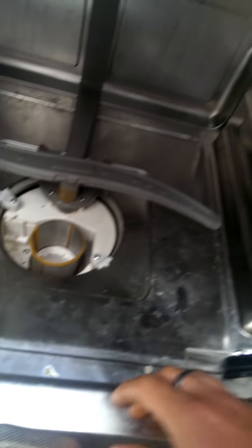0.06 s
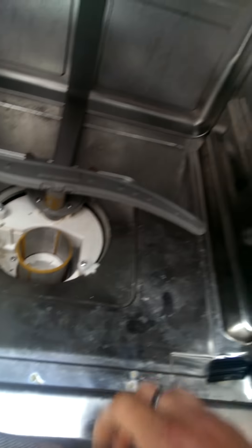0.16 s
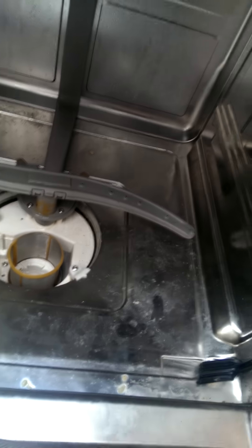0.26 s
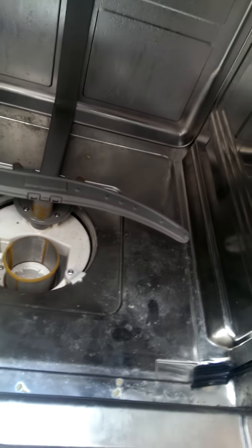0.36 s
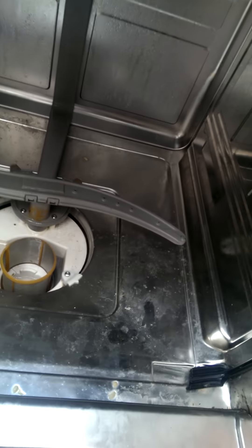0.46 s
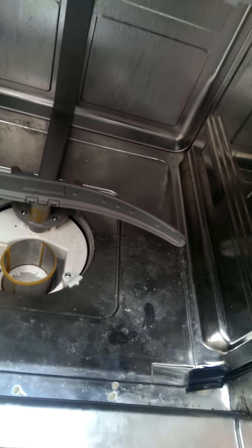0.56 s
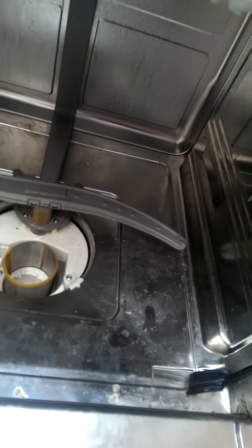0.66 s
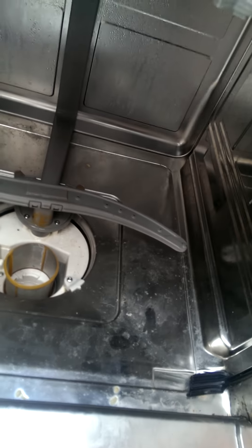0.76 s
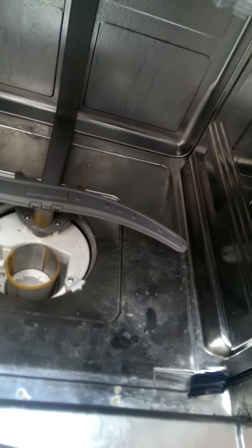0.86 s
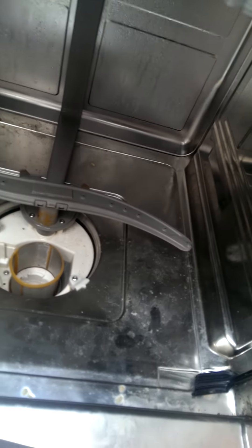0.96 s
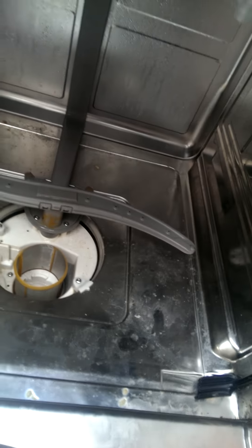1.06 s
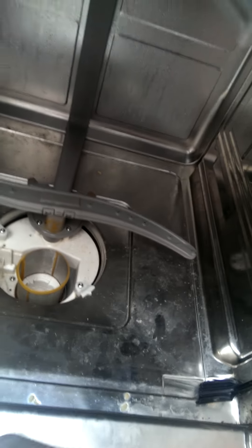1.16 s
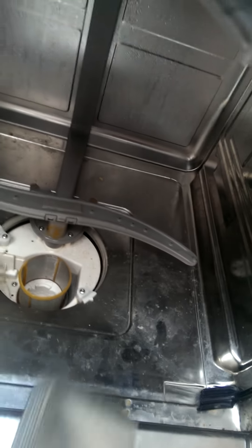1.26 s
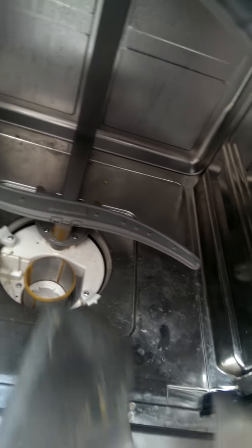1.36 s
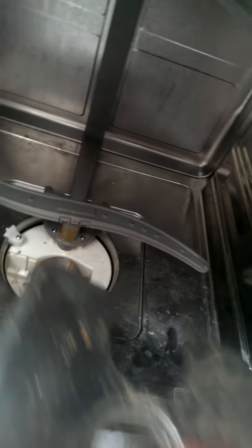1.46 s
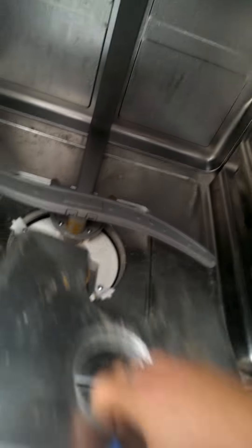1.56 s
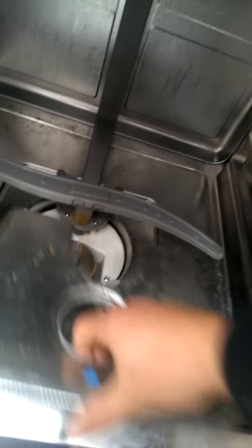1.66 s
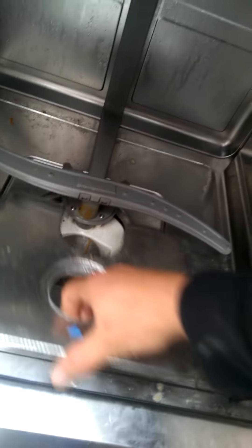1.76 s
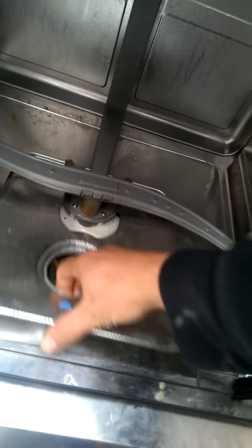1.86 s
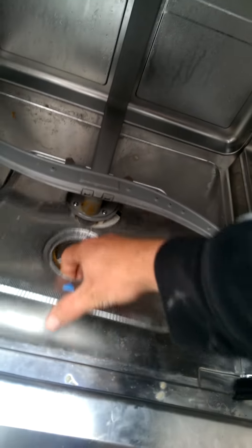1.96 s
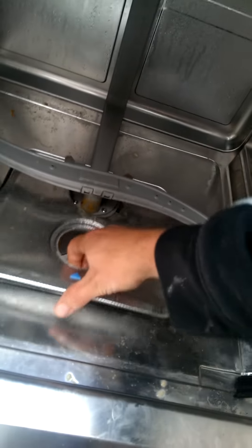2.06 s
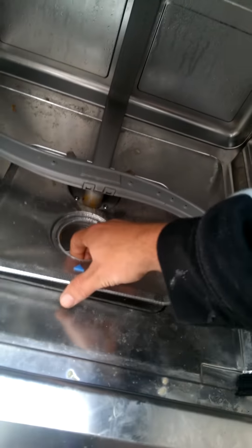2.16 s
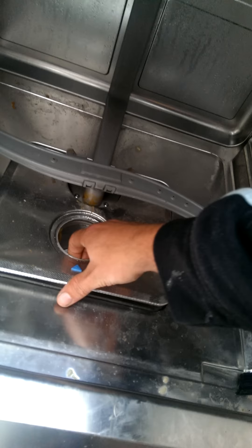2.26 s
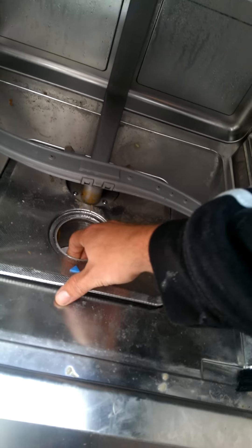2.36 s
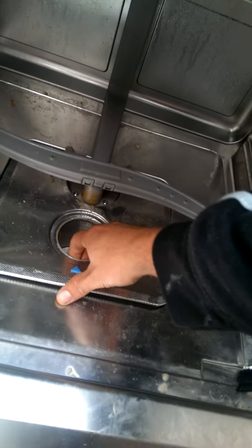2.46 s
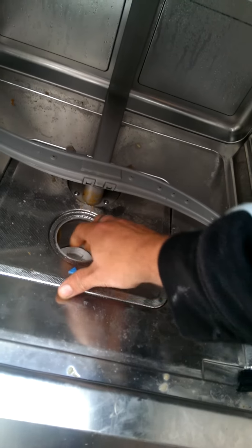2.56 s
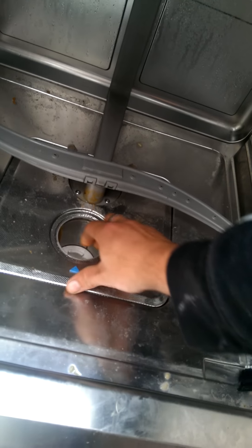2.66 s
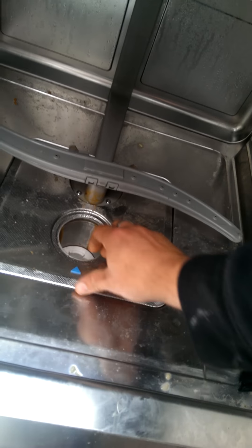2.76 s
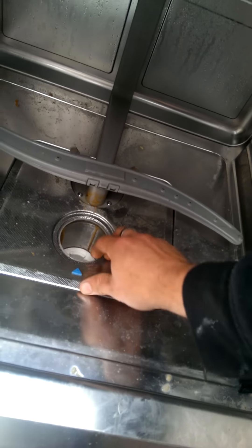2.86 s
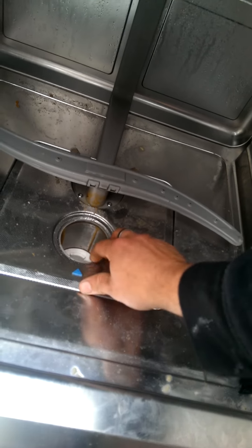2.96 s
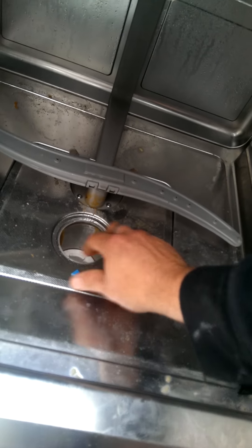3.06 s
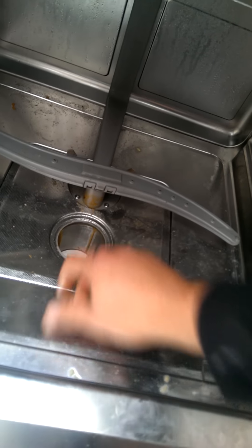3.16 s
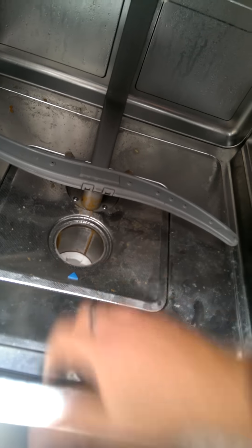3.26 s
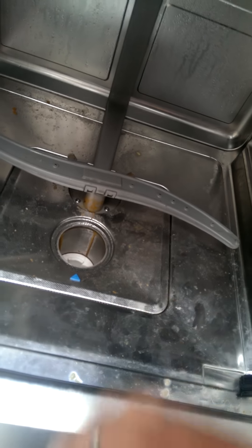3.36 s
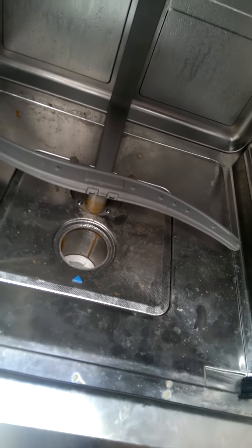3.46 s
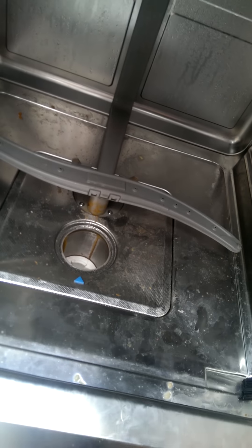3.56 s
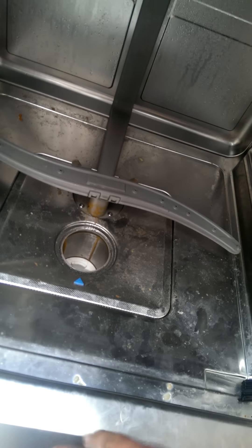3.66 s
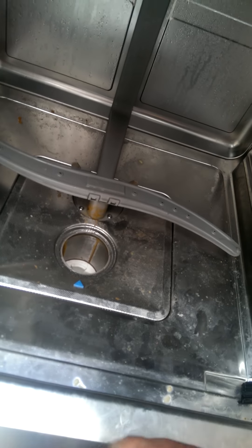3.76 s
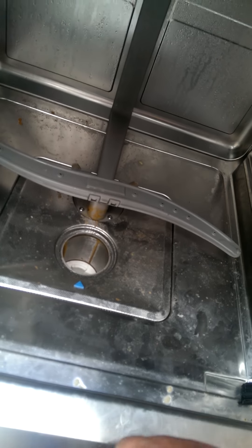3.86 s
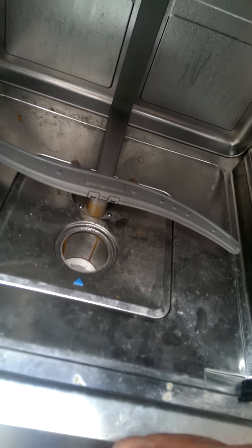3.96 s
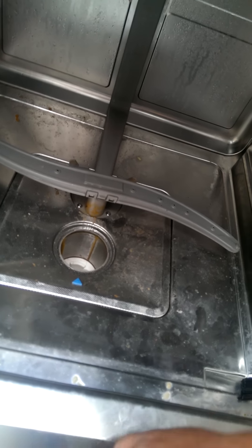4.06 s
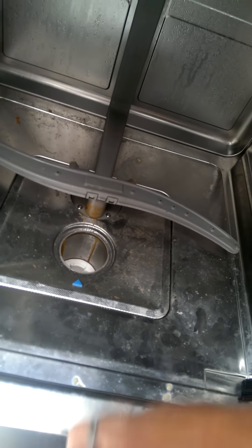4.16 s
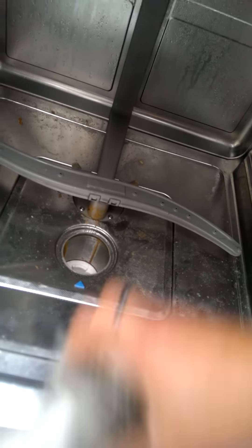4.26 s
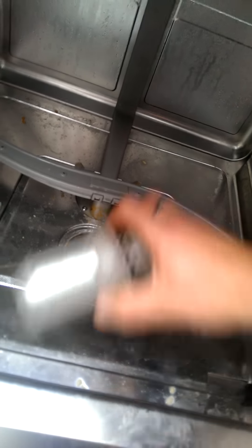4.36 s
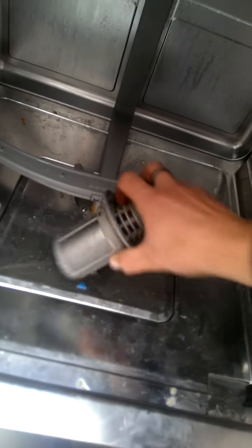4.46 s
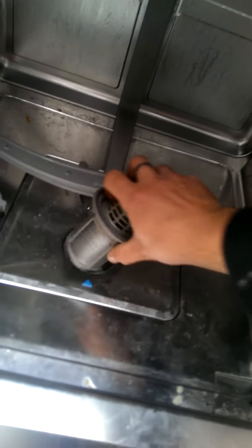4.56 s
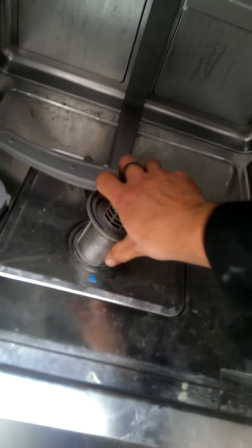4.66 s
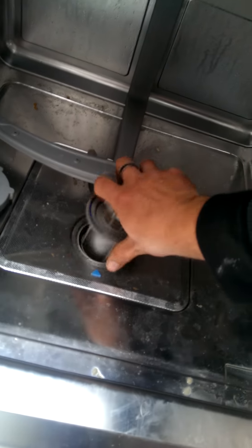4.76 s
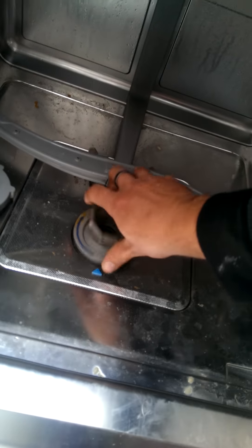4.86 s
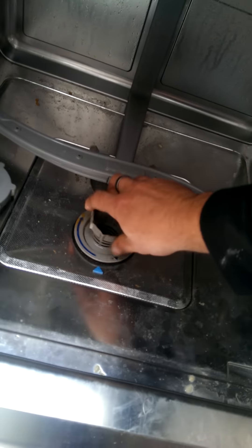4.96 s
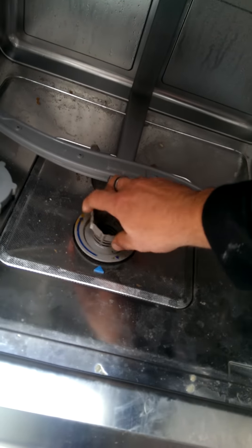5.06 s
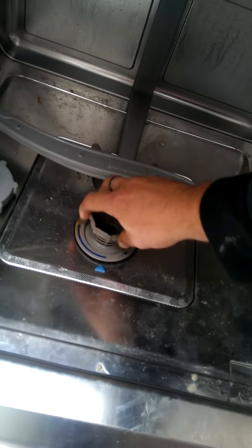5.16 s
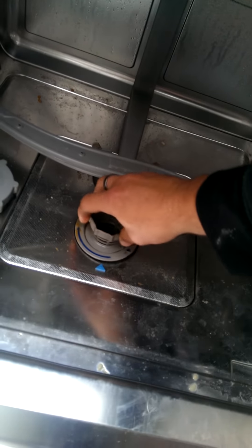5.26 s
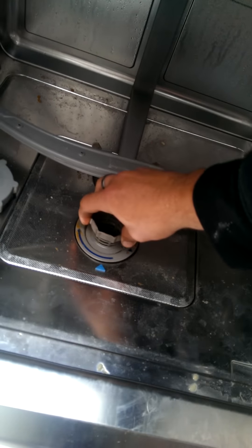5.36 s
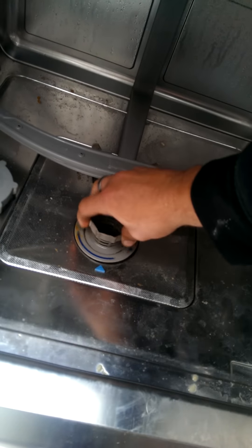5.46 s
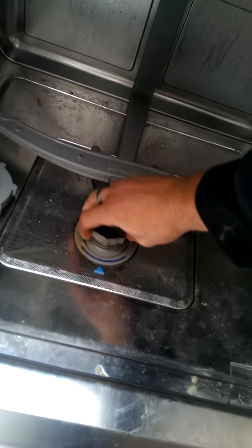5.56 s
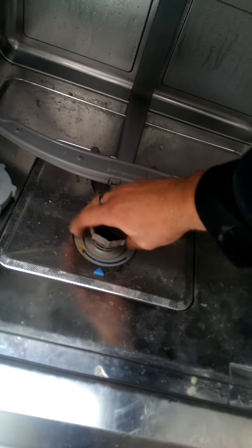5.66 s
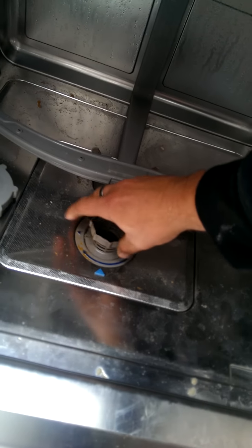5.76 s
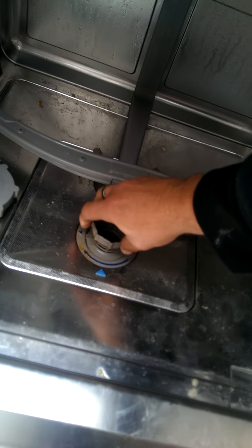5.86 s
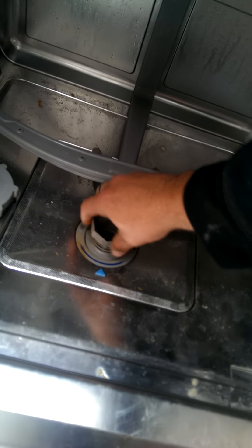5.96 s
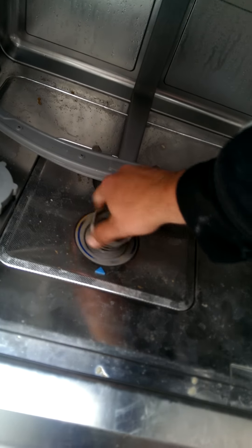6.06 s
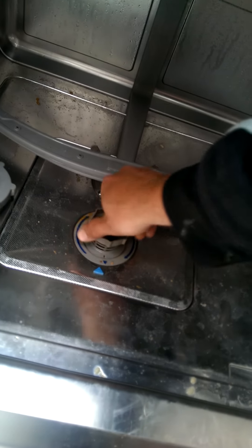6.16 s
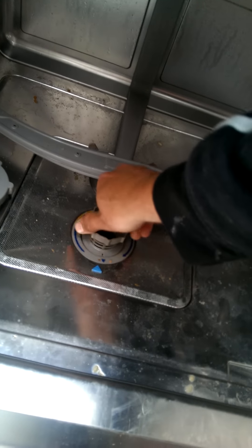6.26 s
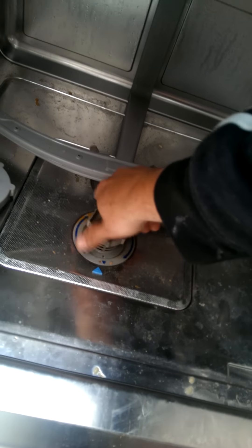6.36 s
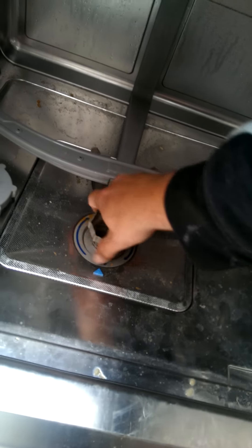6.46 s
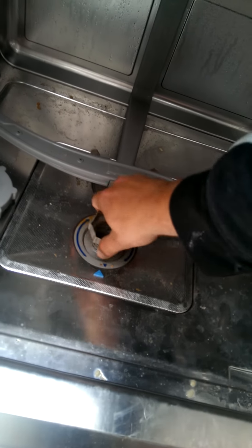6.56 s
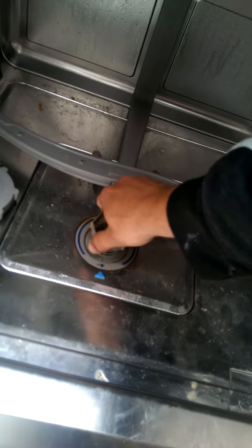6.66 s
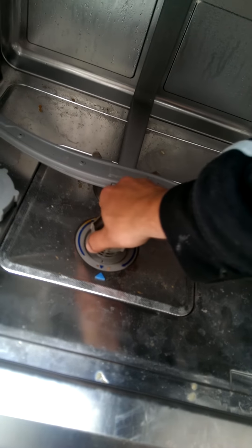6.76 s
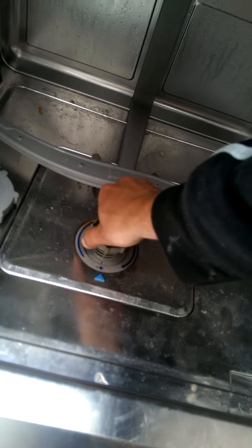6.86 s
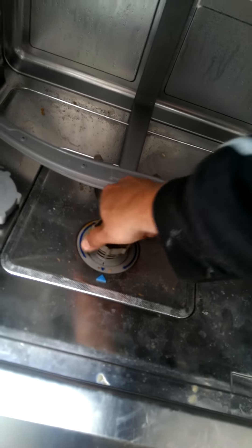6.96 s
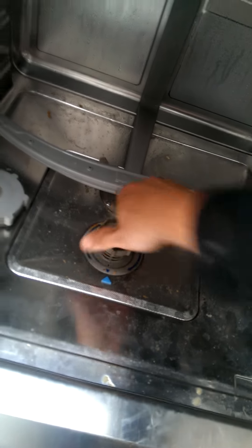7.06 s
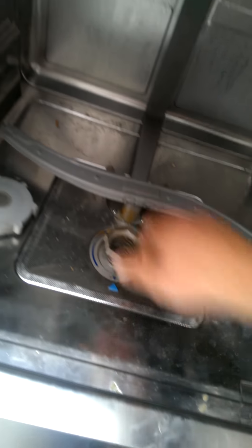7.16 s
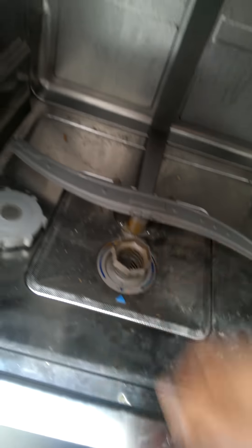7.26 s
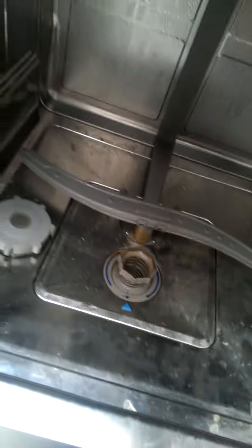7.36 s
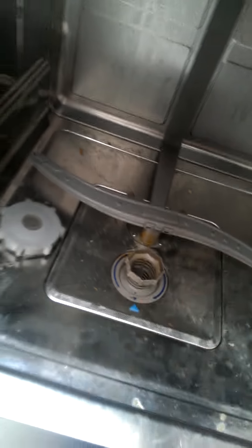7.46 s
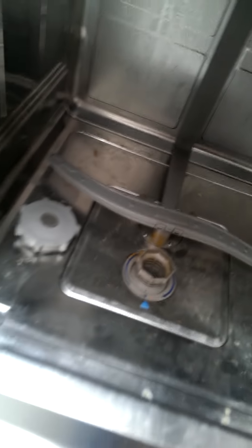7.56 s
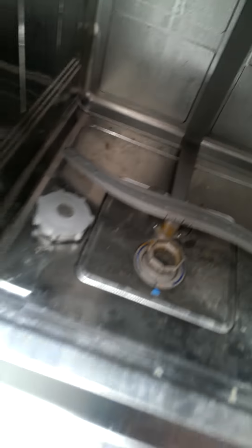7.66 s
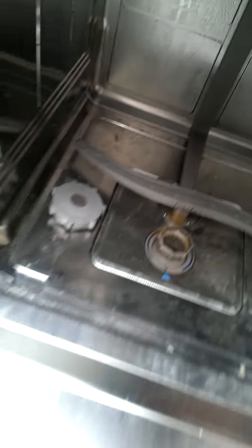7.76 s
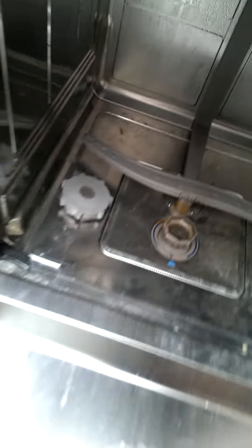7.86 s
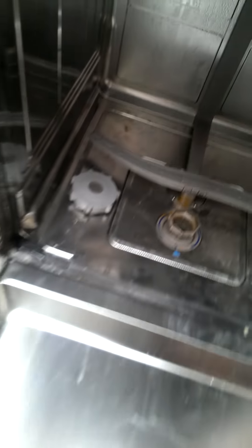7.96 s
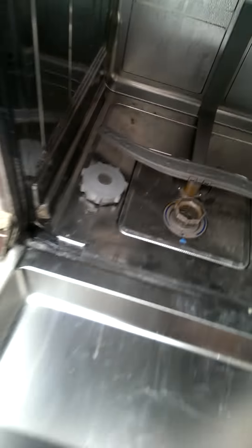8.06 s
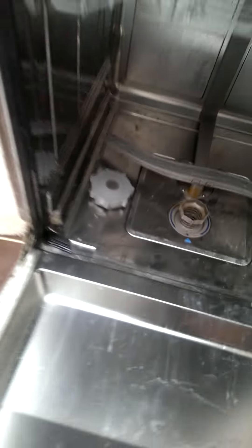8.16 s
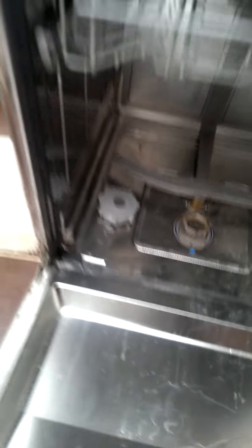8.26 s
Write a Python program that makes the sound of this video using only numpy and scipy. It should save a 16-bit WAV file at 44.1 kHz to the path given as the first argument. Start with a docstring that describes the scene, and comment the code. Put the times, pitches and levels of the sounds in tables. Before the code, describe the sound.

A quiet kitchen hiss and a low motor drone run throughout, with faint rumble from the hand holding the microphone. Around 1 second come a few light taps and scrapes inside a steel dishwasher tub. From 2.1 to 2.5 seconds a steel strainer plate is laid down with a quick, loud cluster of knocks and a scrape, then clatters into its seat at 2.6. Lighter taps and scrapes follow near 3.8. A plastic filter cup clatters in at 4.8 and, louder, at 5 seconds. It is twisted home with small scrapes and pushes, snapping sharply at 5.7 and 6.2. Faint clicks continue to about 7.1, with one soft knock at 7.6. The contacts are close, slightly to the right, and ring briefly in the steel walls. A sleeve rustles faintly at times, and rustle and hiss rise a little near the end, around 8 seconds.

```python
"""A steel strainer plate is laid into the floor of an open dishwasher; a plastic filter cup is then dropped
in and twisted home. Taps, finger pushes, clatters, snaps and scrapes drive the modes of plate or cup and of
the steel tub, whose walls ring on. Noise swells give a sleeve's rustle and one faint, hissy after-ring of
the plate. Behind them: kitchen hiss, a motor drone, the rumble of the hand holding the microphone and a low
rumble that swells around the knocks. Two close ports, the right one louder and brighter."""
import sys
import numpy as np
from scipy import signal
from scipy.fft import rfft, irfft, next_fast_len
from scipy.io import wavfile
from scipy.ndimage import uniform_filter1d

SR = 44100
rng = np.random.default_rng(int(sys.argv[2]) if len(sys.argv) > 2 else 0)


def wrap_up_sound(samples):
    """Save the sound to the file named by the first command line argument, as 16-bit audio."""
    columns = np.atleast_2d(samples).T
    # keep every value between -1 and 1, then stretch to whole-number steps
    tamed = np.clip(columns, -1, 1)
    steps = np.round(tamed * 32767).astype(np.int16)
    wavfile.write(sys.argv[1], SR, steps)


N = 366471

# Soft finger pushes. Each row: start in seconds, ring band level in dB, boom, body and treble in dB
# against the ring band, favoured boom and ring frequencies in Hz.
PUSHES = [(2.3137, -28, -14, -6.5, -8, 248, 2660), (2.3647, -51, 1.5, -.5, -1, 132, 1790),
          (3.0243, -65.5, -1.5, 6, -16, 92.8, 1290), (3.9685, -73, 6, 20, -7.5, 253, 1500),
          (4.4298, -76, -14, -7.5, 7, 62.3, 1420), (4.8346, -40, -3, -4.5, -15, 230, 2880),
          (4.8846, -40, -3, -5, -20, 140, 1240), (5.2022, -51, 17, 1, -15, 131, 1190),
          (5.3148, -40.5, -7.5, -9, -22.5, 133, 1570), (5.4035, -54.5, 18.5, 7, -17, 161, 1800),
          (5.467, -49, -0.5, 2.5, -22.5, 122, 1130), (5.88, -73, 22, 14.5, -14, 132, 1080),
          (6.094, -50.5, 9.5, 5, -4, 132, 1290), (6.159, -29, -15, -5.5, -11, 109, 2310),
          (6.3414, -67, -12, 17, -8, 299, 1180), (6.4282, -71.5, 19, 11, -5, 143.4, 1620),
          (6.572, -67, 17, 10, -9, 131.4, 1200), (6.7608, -59, 18.5, 8.5, -15.5, 135, 1130),
          (7.0693, -71, 23, -2, -8.5, 140, 1390)]
# Sharp contacts. Each row: as PUSHES, then fade in ms.
TAPS = [(0.763, -59, -2.5, -8, -1, 108, 2900, 190), (0.9152, -52.5, 3.5, -4, -13, 206, 1810, 82),
        (1.0004, -32.5, -16, -7.5, -10, 76, 3040, 193), (1.0598, -58, 12, 8.5, -15, 80.6, 1630, 63),
        (2.098, -25.5, -17, -10, -22, 223, 1700, 85), (2.161, -21.5, -23.5, -11, -22, 215, 1560, 128),
        (2.2122, -23.5, -1.5, -7, -26.5, 239, 1620, 86), (2.2393, -25, -1.5, -2, -5, 126.6, 1680, 180),
        (2.2671, -18.5, -10.5, -11, -51, 146.7, 1950, 79), (2.279, -23.5, -14, -7, -6, 169.4, 1964, 120),
        (2.4014, -37, -6, -6.5, -12, 250.4, 1810, 195), (2.4784, -40, -14, -8.5, -11, 246.6, 1940, 83),
        (3.7198, -57.5, 3, -6.5, -6, 81.9, 2230, 104), (3.7942, -33, 6, 5.5, -18.5, 100.7, 2030, 104),
        (4.0672, -57.5, 18.5, 5.5, -13, 104, 2140, 185), (4.2344, -61.5, 0, 5.5, 3, 233, 4200, 94),
        (5.5867, -32.5, -7.5, -4.5, -19.5, 111, 1230, 116), (5.9388, -40, -7.5, -5.5, -1.5, 260, 2570, 140),
        (6.8129, -55, 3, 12, -14.5, 483, 1223, 52), (6.9002, -59.5, -14, 0, -31.5, 61.5, 1200, 86),
        (7.0283, -53.5, 5.5, 9, -10, 470, 1480, 113), (7.1232, -53, 11.5, 12.5, -27.5, 470, 1470, 58),
        (7.608, -43, 3, 3, -25, 99.4, 2100, 520)]
# A part clatters or snaps into its seat; the last two are short cup snaps.
# Each row: as PUSHES, then hold in ms.
CLATTERS_AND_SNAPS = [(2.621, -18.5, -7, -5, -5, 111.6, 2600, 56),
                      (4.762, -29.5, -3.5, -5, -9, 102.5, 2326, 22),
                      (4.962, -17.5, -4, -2, -7.5, 471, 2760, 36),
                      (5.702, -23, -11.5, -5.5, -9.5, 235, 1500, 2.8),
                      (6.182, -24.5, -13.5, -5, -2.5, 122.4, 2180, 5.5)]
# A part slides. Each row: as PUSHES, then swell in ms, hold in ms.
SCRAPES = [(0.921, -46, 6, -1, -14, 217, 1460, 16.5, 57), (1.039, -47, -15, -7.5, -12.5, 76, 3200, 21, 63),
           (2.23, -23.5, -20.5, -12, -18, 142, 1970, 9.7, 71),
           (3.725, -52.5, 1, -7.5, -13, 100, 2100, 28, 97),
           (3.769, -38.5, -20, -24, -12, 99.3, 2130, 6.8, 25),
           (3.839, -52.5, -1.5, -15, -7, 99.8, 3700, 21.5, 64),
           (3.99, -64.5, -7.5, 0, -9, 100, 3290, 24, 36),
           (4.909, -42.5, 2.5, -1.5, -21.5, 101, 1140, 32, 5),
           (5.547, -50.5, 5, 0.5, -12, 130, 1950, 15, 41),
           (5.606, -51, 9.5, 5.5, -4.5, 117.5, 5000, 12.5, 57),
           (5.672, -36.5, 1.5, -19, -27.5, 135, 1420, 18.5, 10),
           (6.011, -54, 2, 3.5, -9, 120, 1980, 22, 74), (6.099, -46, 8.5, 2, -1, 116.4, 2040, 39, 30),
           (6.673, -62, 5, 3, 1.5, 140, 3000, 17.5, 32), (6.727, -56, 14.5, 1.5, 2.5, 142, 3540, 11, 35.5)]
# Modes of plate, cup and tub. Each row: frequency in Hz, gain in dB, t60 in seconds before limiting.
PLATE_MODES = [(517, -0.5, .06), (631, 0, .08), (1310, -7, 0.12), (1584, 4, 0.016), (1907, 1, 0.038),
               (1970, -10.5, .08), (2562, -4, 0.092), (2840, -13.5, .05), (3400, -20, .07),
               (4120, -7, 0.047), (4600, -21.5, 0.15), (6000, -14, 0.043), (6500, -17, .05)]
CUP_MODES = [(594, -10, 0.074), (1149, 3, 0.088), (1502, 1.5, 0.012), (1805, 6.5, 0.09), (2076, -2, 0.013),
             (2490, 0.5, 0.069), (2864, -14, 0.09), (3140, -0.5, 0.048), (3830, -9.5, 0.048),
             (4010, -4, .03), (5000, -18.5, 0.09), (6100, -12, .03)]
TUB_MODES = [(82.1, 0.014, 0.59), (104.8, 0.0054, 0.087), (130.2, 0.0061, 0.05), (199.4, 0.0064, 0.032),
             (241.1, 0, 0.15), (322.5, 0.019, 0.078), (396, 0.0033, 0.08), (475, 0.043, 0.03)]
# Dense ring of the walls. Each row: frequency in Hz, t60 in seconds before limiting.
TUB_TAIL_T60 = [(60, 1.9), (160, 0.54), (420, 0.64), (1100, 0.44), (2910, 0.4), (7680, 0.24)]
# Position of the working hand. Each row: time in seconds, left minus right in dB.
HAND_PAN = [(0.8, -4), (2.0, -9), (3.0, -5.5), (3.7, -3.5), (4.0, -5), (4.7, -6.5), (5.7, -7), (6.1, -8),
            (7.6, -5.5)]
# Contact bands: boom, body, ring, edge, treble. Each row: low and high edge in Hz.
BANDS_HZ = [(65, 300), (300, 820), (1080, 2400), (2400, 5200), (5200, 18000)]
# One value per band: left minus right in dB.
BAND_PAN_DB = [1, 2.5, 1, 2.5, -4.5]
# One value per band: extra decay as a share of the contact's fade rate.
BAND_EXTRA_DECAY = [0.01, 0.05, .2, .45, .7]
# Sleeve rustles; the row at 2.92 s is the faint hissy after-ring of the plate's clatter.
# Each row: peak time in seconds, Gaussian sigma in seconds, broad noise in dB, crisp top in dB.
RUSTLE_SWELLS = [(.42, 0.23, -71, -72.5), (.95, .3, -73, -76), (1.995, 0.16, -73, -64.5),
                 (2.92, 0.078, -68, -86), (3.35, 0.26, -79, -77), (4.724, 0.22, -85, -73),
                 (7.097, 0.19, -90, -70.5), (7.656, 0.19, -63.5, -73.5), (8.28, 0.27, -59, -60)]
# Rustle and room noise spectra. Each row: frequency in Hz, relative density in dB.
RUSTLE_SPECTRUM = [(700, -39), (1300, -14.5), (2000, -6.5), (2900, -9), (3900, -3.5), (4600, -2.5),
                   (5300, -6.5), (5900, -11.5), (6450, -6), (7100, -13), (9500, -23), (10500, -19.5),
                   (13000, -38.5)]
HISS_SPECTRUM = [(15, -43), (25, -19), (120, -8), (149, -26), (249, -17.5), (317, -21.5), (344, -18.5),
                 (394, -28), (476, -20.5), (516, -25.5), (1400, -22.5), (3620, -31.5), (11600, -38.5),
                 (13200, -33), (16000, -44.5)]
# Motor drone. Each row: centre in Hz, width in Hz, relative level in dB.
DRONE_BANDS = [(107.3, 5, 0), (221.4, 6.5, -12), (352, 5, -14), (270, 13, -7.5), (75.5, 11, -2.5)]
# The microphone backs out of the tub: hiss grows, drone sinks. Each row: time in seconds, hiss lift in dB.
HISS_LIFT = [(0, 1.6), (7.6, 2), (8.0, 5.5), (8.31, 7)]
# Rumble of the holding hand. Each row: time in seconds, level in dB.
GRIP_LEVELS = [(0.0, -69), (0.5, -59), (0.75, -83), (1.3, -78), (1.6, -66.5), (1.96, -78.5), (2.55, -69.5),
               (3.0, -60.5), (4.55, -79), (5.4, -76.5), (6.06, -75), (6.25, -61), (7.5, -58.5), (8.31, -68)]
# Low rumble that swells around the knocks. Each row: peak time in seconds, level in dB.
RUMBLE_SWELLS = [(.97, -54), (2.25, -64), (2.7, -56.5), (4.8, -65.5), (4.98, -51), (5.741, -54)]
# Likeness of the two ports. Each row: frequency in Hz, coherence from 0 to 1.
COHERENCE = [(60, .95), (130, 0.87), (290, 0.9), (640, 0.6), (1400, 0.02), (16000, 0.03)]
# Balance of background and rustle. Each row: frequency in Hz, left minus right in dB.
BACKGROUND_PAN = [(60, -3), (110, -7.5), (200, 0), (380, -8), (700, -2), (1290, -6), (2380, -3.5),
                  (4400, -2), (8120, 2), (15000, -2.5)]
RUSTLE_PAN = [(60, -1), (110, 2), (200, -10.5), (380, 3.5), (700, -5.5), (1290, 0.5), (2380, 1), (4400, -1),
              (8120, -7.5), (15000, -14.5)]

DUCT_HZ, DUCT_WIDTH_HZ = 13400, 2800
CUP_FROM_S, PLATE_MAX_T60_S, CUP_MAX_T60_S = 3.4, .026, .022  # the hand damps both parts
LEAD_MS, LEFT_LAG_MS = 1.5, 0.12
SPAN = 1 << 14  # samples per contact
SPAN_MS, SPAN_HZ = np.arange(SPAN) * 1000 / SR, np.arange(SPAN // 2 + 1) * SR / SPAN
TIME_S = np.arange(N) / SR


def undb(db):
    return 10 ** (np.asarray(db, float) / 20)


def at_hz(table, hz):
    """Table value on a log-frequency axis."""
    points_hz, values = np.transpose(table)
    return np.interp(np.log(np.maximum(hz, 1)), np.log(points_hz), values)


def curve_db(table):
    """Level over time, fading out beyond the table's ends."""
    s, db = np.transpose(table)
    return np.interp(TIME_S, np.r_[s[0] - .15, s, s[-1] + .15], np.r_[-95, db, -95])


def wander(rate_hz):
    """Smoothed random steps, spread 1."""
    hold = int(SR / rate_hz)
    steps = np.repeat(rng.standard_normal(N // hold + 1), hold)
    smooth = uniform_filter1d(uniform_filter1d(steps, hold), hold)[:N]
    return smooth / smooth.std()


def resonance(centre_hz, width_hz, hz):
    """Response of one mode, gain 1 at its centre."""
    return 1j * hz * width_hz / (centre_hz ** 2 - hz ** 2 + 1j * hz * width_hz)


def stereo(spectra, hz, min_coherence=0):
    """Two spectra mixed to left and right, alike in the bass."""
    left, other = spectra
    alike = np.clip(at_hz(COHERENCE, hz), min_coherence, 1)
    return np.array([left, alike * left + np.sqrt(1 - alike ** 2) * other])


def noise(gain_at_hz, pan_table):
    """Shaped stereo noise, rms 1."""
    size = next_fast_len(N)
    hz = np.arange(size // 2 + 1) * SR / size
    spectra = rfft(rng.standard_normal((2, size))) * gain_at_hz(hz)
    pan = undb(np.outer([.5, -.5], at_hz(pan_table, hz)))
    sound = irfft(stereo(spectra, hz) * pan, size)[:, :N]
    return sound / np.sqrt(np.mean(sound ** 2))


def kitchen():
    """Room hiss and a wavering motor drone of narrow noise bands."""
    def drone_gain(hz):
        return np.sqrt(sum(undb(2 * db) / width_hz * abs(resonance(centre_hz, width_hz, hz)) ** 4
                           for centre_hz, width_hz, db in DRONE_BANDS))

    lift_db = curve_db(HISS_LIFT)
    hiss_db = -64.5 + lift_db + 0.26 * wander(0.41)
    hiss = undb(hiss_db) * noise(lambda hz: undb(at_hz(HISS_SPECTRUM, hz)), BACKGROUND_PAN)
    drone = undb(-63 - 0.84 * lift_db) * noise(drone_gain, BACKGROUND_PAN)
    return hiss + drone


def low_rumble(rise_db_per_s=130.5, fall_db_per_s=77.5):
    """Rumble of the hand on the microphone, plus low swells around the knocks."""
    peak_s, peak_db = np.transpose(RUMBLE_SWELLS)[:, :, None]
    since_s = TIME_S - peak_s
    swells = undb(peak_db + np.minimum(rise_db_per_s * since_s, -fall_db_per_s * since_s)).sum(axis=0)
    rumble = noise(lambda hz: np.exp(-((hz - 46) / 14) ** 2), BACKGROUND_PAN)
    return (undb(curve_db(GRIP_LEVELS)) + swells) * rumble


def rustle():
    """Sleeve cloth sliding, and one hissy after-ring of the plate; the crisp top sings in the port duct."""
    peak_s, sigma_s, broad_db, crisp_db = np.transpose(RUSTLE_SWELLS)[:, :, None]
    swells = np.exp(-.5 * ((TIME_S - peak_s) / sigma_s) ** 2)
    broad_gain, crisp_gain = (np.sum(undb(db) * swells, axis=0) for db in (broad_db, crisp_db))
    broad = noise(lambda hz: undb(at_hz(RUSTLE_SPECTRUM, hz)), RUSTLE_PAN)
    crisp = noise(lambda hz: resonance(DUCT_HZ, DUCT_WIDTH_HZ, hz) ** 2, RUSTLE_PAN)
    flicker = undb(wander(21) + 1.2 * wander(300))
    return flicker * (broad_gain * broad + crisp_gain * crisp)


def duct(sound):
    """The right port's duct lifts a broad band near the top."""
    b, a = signal.iirpeak(DUCT_HZ, DUCT_HZ / DUCT_WIDTH_HZ, fs=SR)
    band = signal.lfilter(b, a, signal.lfilter(b, a, sound[1]))
    return sound + np.outer([0, 1], undb(6.5) * band)


def tub_tail(sound, level_db=-15, onset_s=0.004):
    """The steel walls ring on as a dense tail, longest in the bass."""
    t, tail = np.arange(2 * SPAN) / SR, 0
    for hz in 70 * 2 ** np.arange(0, 8, .5):
        sos = signal.butter(1, (hz / 2 ** .25, hz * 2 ** .25), "bandpass", fs=SR, output="sos")
        band = signal.sosfilt(sos, rng.standard_normal((2, 2 * SPAN)))
        fade = undb(-60 * t / np.clip(at_hz(TUB_TAIL_T60, hz), .05, 1.2))
        tail = tail + band * fade / np.sqrt(np.sum(fade ** 2))
    tail = tail * np.minimum(t / onset_s, 1) / np.sqrt(np.sum(tail ** 2) / 2)
    tail = irfft(stereo(rfft(tail), np.arange(SPAN + 1) * SR / (2 * SPAN)))
    return undb(level_db) * signal.fftconvolve(sound, tail, axes=1)[:, :N]


def contact_force(swell_ms, fade_db, grit_db, snap, click):
    """A gritty noise burst: swell, hold, fade."""
    envelope = np.minimum(SPAN_MS / swell_ms, 1) ** 2 * undb(fade_db)
    envelope *= 1 + snap * np.exp(-np.abs(SPAN_MS - swell_ms) / 1.4)  # hard edges meet first
    grit = undb(grit_db * uniform_filter1d(rng.standard_normal(SPAN), size=36) * 6)
    force = envelope * grit * rng.standard_normal((2, SPAN))
    force[:, int(swell_ms * SR / 1000)] += click  # one clean blow
    return force


def part_response(start_s, boom_hz, ring_hz, ring_favour_db):
    """Modes of tub and plate or cup; the place touched favours those near boom_hz and ring_hz."""
    part, max_t60_s = (CUP_MODES, CUP_MAX_T60_S) if start_s > CUP_FROM_S else (PLATE_MODES, PLATE_MAX_T60_S)
    damped = [(hz, db, min(t60_s, max_t60_s)) for hz, db, t60_s in part]
    mode_hz, mode_db, t60_s = np.vstack([TUB_MODES, damped]).T
    count = len(mode_hz)
    width_hz = np.log(1000) / np.pi / np.clip(t60_s, .015, .4)
    bent_hz = mode_hz * (1 + .03 * rng.standard_normal(count))  # each grip bends the part
    favour_db = (10 * np.exp(-(np.log(mode_hz / boom_hz) / .13) ** 2)
                 + ring_favour_db * np.exp(-(np.log(mode_hz / ring_hz) / .15) ** 2))
    gains = undb(6 + mode_db + favour_db + 2 * rng.standard_normal(count)) * (-1) ** np.arange(count)
    return 1 + gains @ resonance(bent_hz[:, None], width_hz[:, None], SPAN_HZ)


def contacts(rows, swell_ms, hold_ms, fade_ms, grit_db, snap=0, click=0, early_share=0, ring_favour_db=6):
    """Each row's force rings a part; five bands get their own decay, level and pan."""
    out = np.zeros((2, N + SPAN))
    filters = [signal.butter(3, edges, "bandpass", fs=SR, output="sos") for edges in BANDS_HZ]
    bands = np.array([signal.sosfreqz(sos, SPAN_HZ, fs=SR)[1] for sos in filters])
    bands /= 1 + 1j * SPAN_HZ / 3500  # one-pole low-pass
    lag = np.exp(-2j * np.pi * np.outer([LEFT_LAG_MS / 1000, 0], SPAN_HZ))
    pans_db = np.interp(rows[:, 0], *np.transpose(HAND_PAN))
    for row, (swell, hold, fade, pan_db) in zip(rows, np.broadcast(swell_ms, hold_ms, fade_ms, pans_db)):
        start_s, ring_db, boom_db, body_db, treble_db, boom_hz, ring_hz = row[:7]
        fade_db = -60 * np.maximum(SPAN_MS - swell - hold, 0) / fade
        force = contact_force(swell, fade_db, grit_db, snap, click)
        drive = stereo(rfft(force), SPAN_HZ, min_coherence=0.27) * lag
        response = part_response(start_s, boom_hz, ring_hz, ring_favour_db)
        banded = irfft((drive * response)[:, None] * bands, SPAN)
        banded *= undb(np.outer(BAND_EXTRA_DECAY, fade_db))
        power = uniform_filter1d(banded[..., :SPAN // 2] ** 2, size=500)
        banded /= np.sqrt(power.max(axis=2, keepdims=True))
        edge_db = 6 + .45 * treble_db
        band_db = ring_db + np.array([boom_db, body_db, 0, edge_db, treble_db])
        port_db = np.outer([.5, -.5], pan_db + np.array(BAND_PAN_DB))
        at = int((start_s - (LEAD_MS + early_share * swell) / 1000) * SR)
        out[:, at:at + SPAN] += np.einsum("cb,cbt->ct", undb(band_db + port_db), banded)
    return out[:, :N]


def pushes():
    """Fingers press a part: slow swell, little grit."""
    return contacts(np.array(PUSHES), swell_ms=9.8, hold_ms=15, fade_ms=79, grit_db=1.5, early_share=.7)


def scrapes():
    """A part slides: coarse grit, strongly favoured ring."""
    rows = np.array(SCRAPES)
    return contacts(rows, swell_ms=rows[:, 7], hold_ms=rows[:, 8], fade_ms=46, grit_db=3.5,
                    ring_favour_db=10.5)


def clatters_and_snaps():
    """A part clatters or snaps into its seat: fast onset, long fade."""
    rows = np.array(CLATTERS_AND_SNAPS)
    return contacts(rows, swell_ms=4, hold_ms=rows[:, 7], fade_ms=154, grit_db=-0.5, snap=.3,
                    ring_favour_db=2)


def taps():
    """A part strikes the tub: one click and a short burst of grit."""
    rows = np.array(TAPS)
    return contacts(rows, swell_ms=.55, hold_ms=4.2, fade_ms=rows[:, 7], grit_db=3, snap=0.48, click=6.4)


def scene():
    groups = (taps(), pushes(), clatters_and_snaps() + scrapes())
    handling = sum(group + tub_tail(group) for group in groups)
    return duct(handling) + rustle() + kitchen() + low_rumble()


def record(dry, ceiling=1.3, cutoff_hz=15750):
    """Soft clip, then a steep low-pass."""
    lowpass = signal.ellip(10, .2, 60, cutoff_hz, fs=SR, output="sos")
    return signal.sosfilt(lowpass, ceiling * np.tanh(dry / ceiling))


dry = scene()
out = record(dry)
wrap_up_sound(out)
```